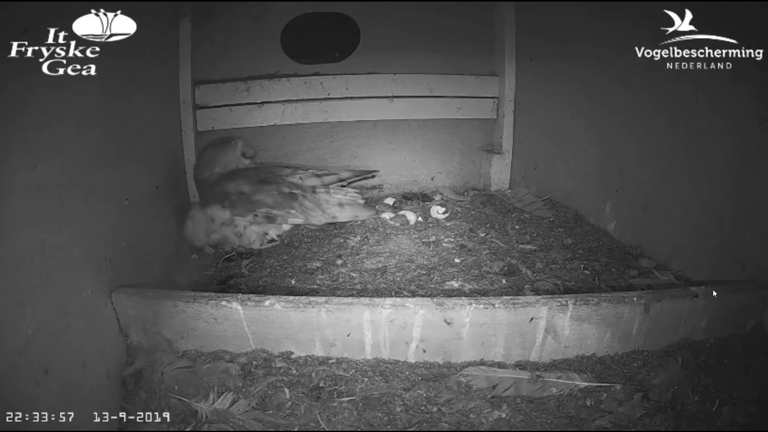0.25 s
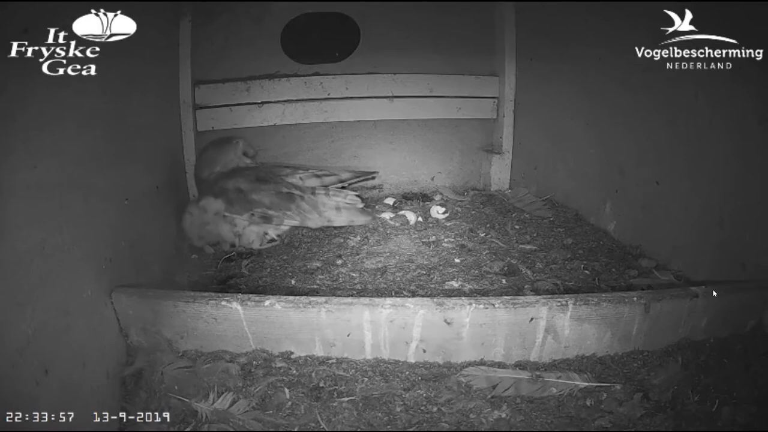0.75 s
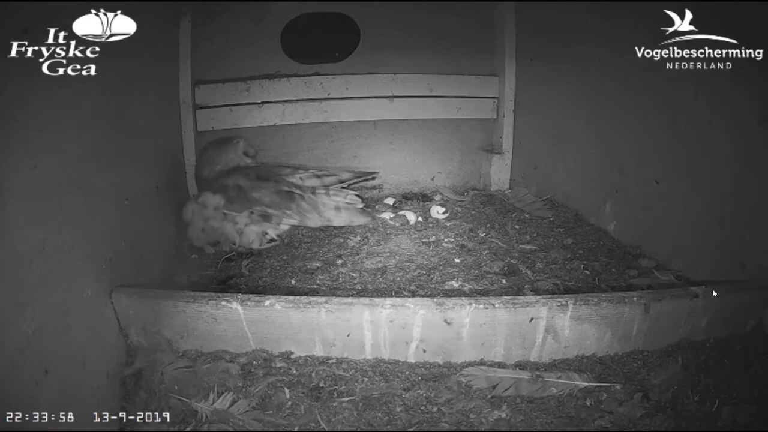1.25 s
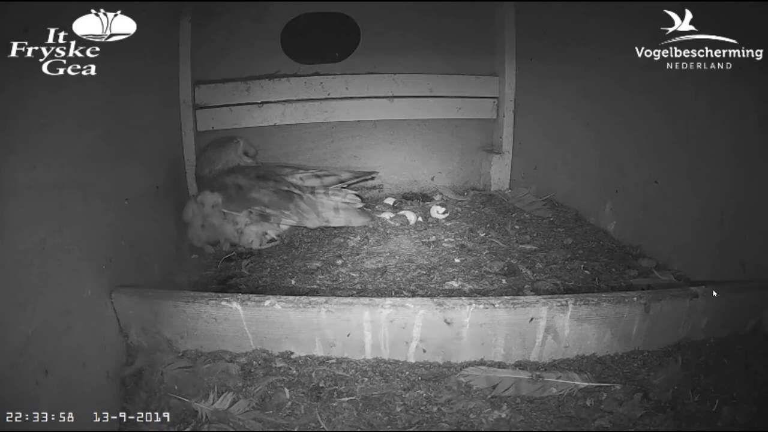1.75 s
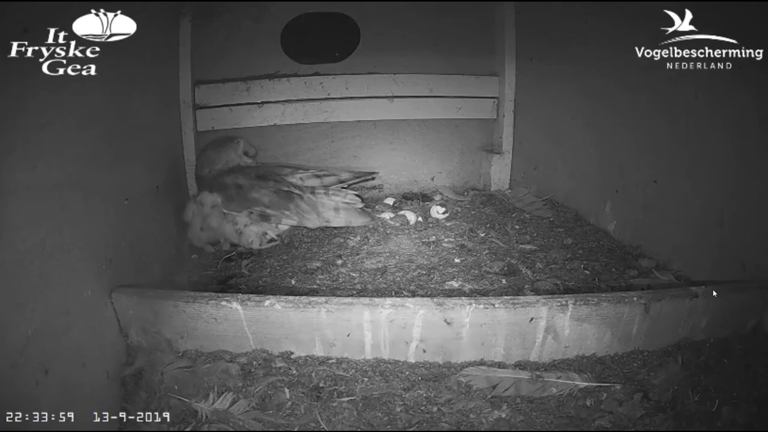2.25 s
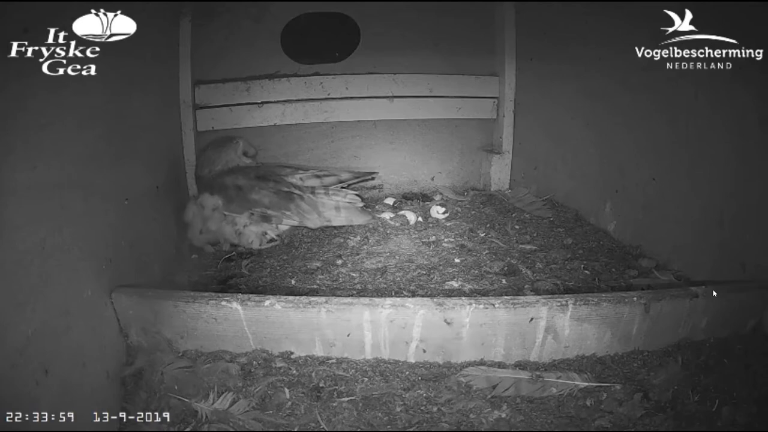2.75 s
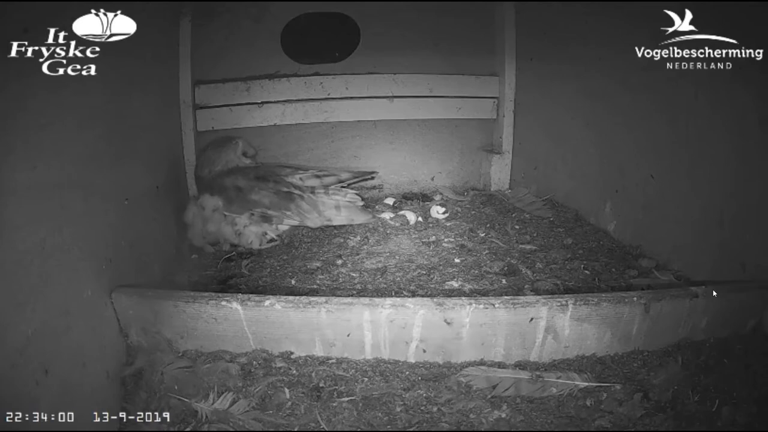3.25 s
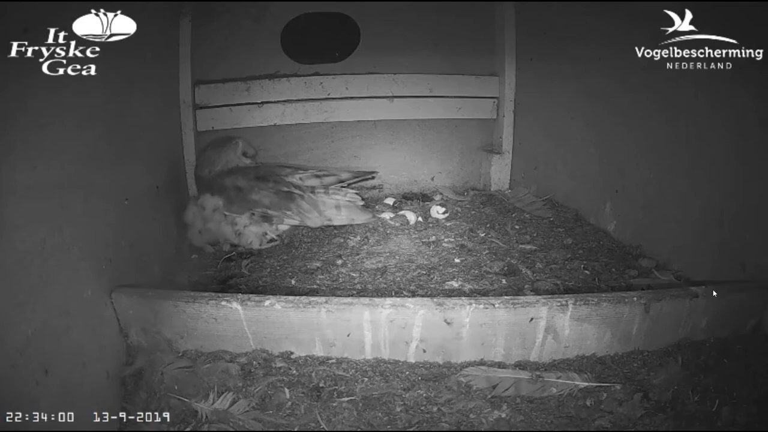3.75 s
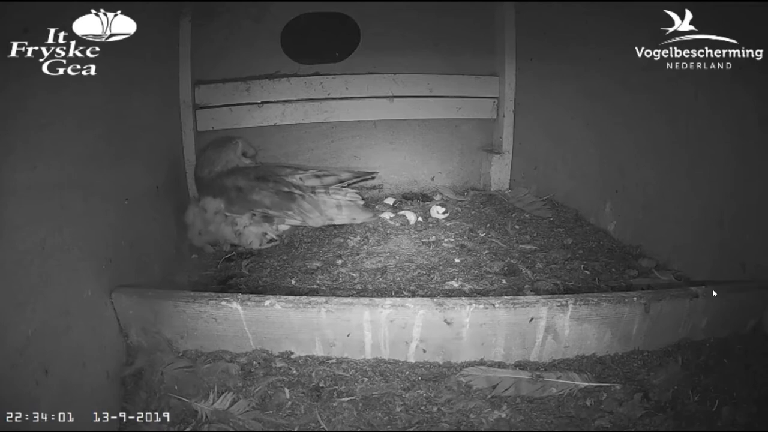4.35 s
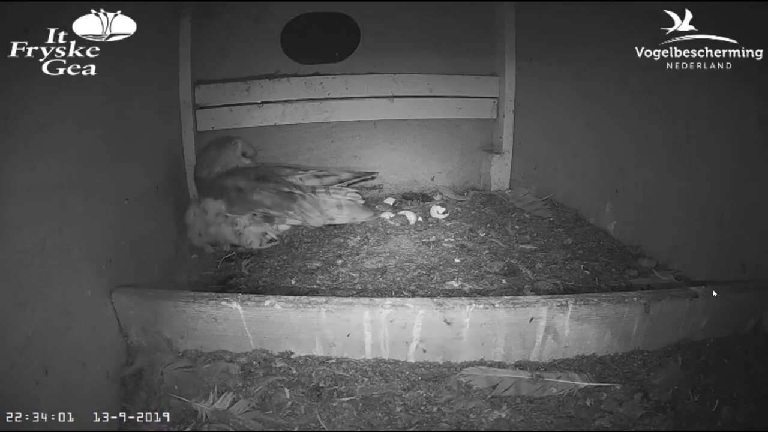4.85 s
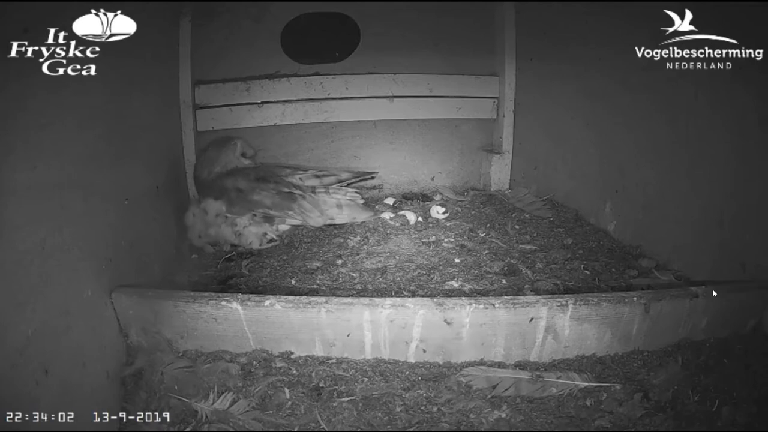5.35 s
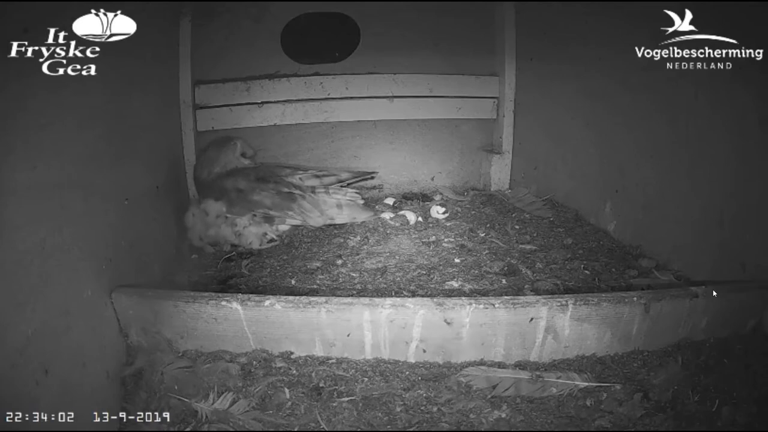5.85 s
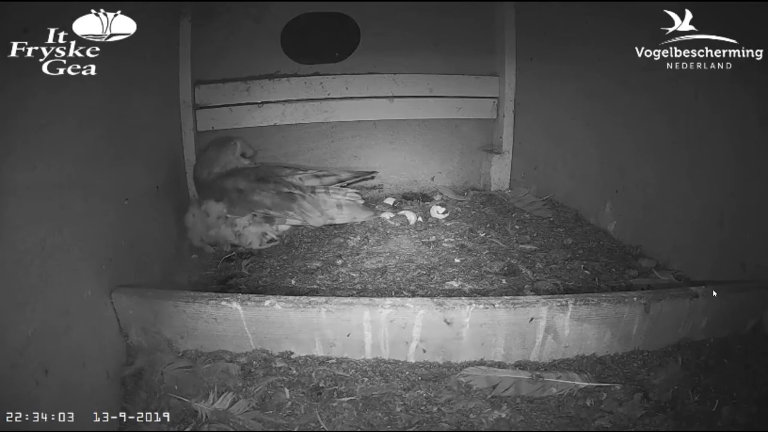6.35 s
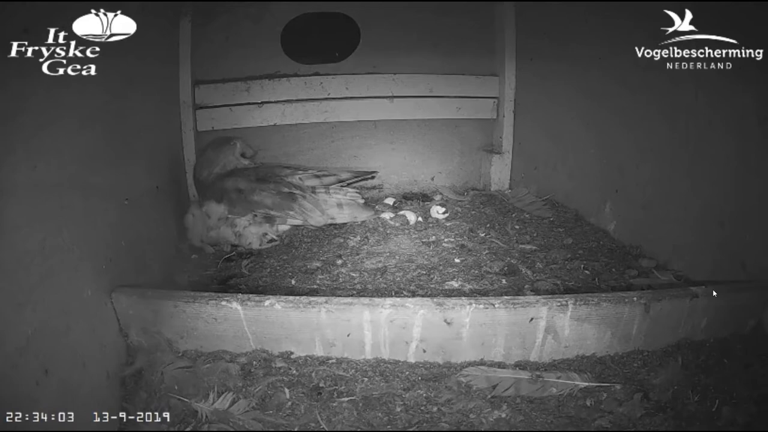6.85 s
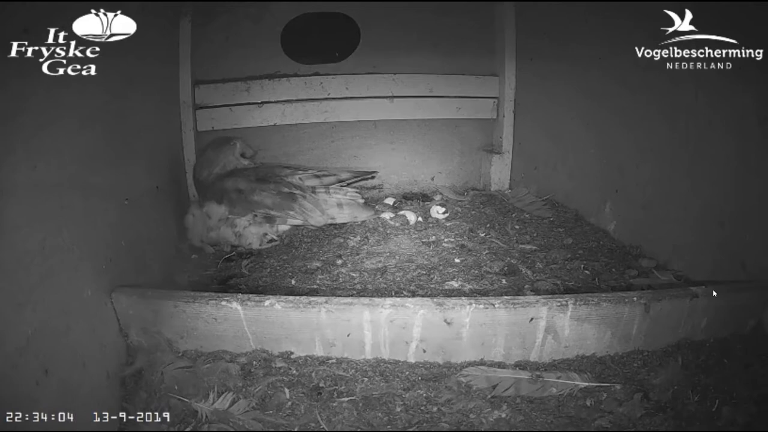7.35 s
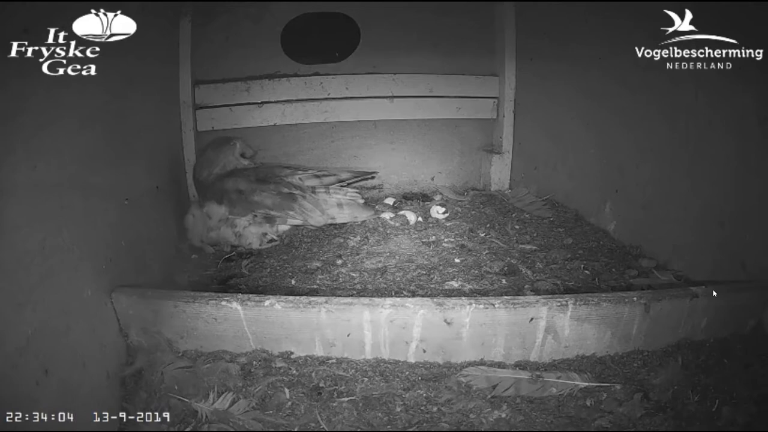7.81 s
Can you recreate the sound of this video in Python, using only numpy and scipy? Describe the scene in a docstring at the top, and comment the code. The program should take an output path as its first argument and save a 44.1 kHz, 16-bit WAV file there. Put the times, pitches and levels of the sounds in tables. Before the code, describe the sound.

Inside a wooden nest box at night, faint chick rasps and distant peeps open over low rumble and crackly hiss. A loud harsh owl hiss rasps for over half a second, then a soft high warbling twitter. A second, shorter hiss follows, then two more thin trills. A cheap, bright, band-limited camera microphone adds grit; the barn answers the hisses faintly.

```python
"""A young barn owl gives two loud rasping hisses: noise through resonances that open with its beak. Around them
a chick twitters softly (a warbling whistle) and rasps in short puffs of noise, and another peeps far off. The
wooden nest box colours and answers the owls; the barn answers the hisses, over a low rumble and the
microphone's soft hiss. A cheap camera rounds the sound in coarse logarithmic steps, so the quiet crackles
wherever the rumble crosses zero; its stream adds a little noise around every sound; the treble is then lifted
and the peaks limited."""
import sys
import numpy as np
from scipy import signal
from scipy.fft import rfft, irfft, next_fast_len
from scipy.io import wavfile
from scipy.ndimage import uniform_filter1d, minimum_filter1d, map_coordinates

SR = 44100
rng = np.random.default_rng(int(sys.argv[2]) if len(sys.argv) > 2 else 0)


def generate_wav(signal):
    """Clip the signal to [-1, 1] and save it as 16-bit WAV at the path in sys.argv[1]."""
    frames = np.transpose(np.atleast_2d(signal))
    scaled = np.clip(frames, -1, 1) * 32767
    pcm = np.round(scaled).astype(np.int16)
    wavfile.write(sys.argv[1], SR, pcm)


def ratio_of_db(decibels):
    """Turn decibels (scalar or array-like) into linear amplitude factors; 0 dB maps to 1."""
    return 10 ** (np.asarray(decibels, float) / 20)


N = 356328  # samples


def along(points, hz):
    """A curve through (Hz, value) points, straight on a log frequency axis."""
    point_hz, values = np.transpose(points)
    return np.interp(np.log(hz + 1), np.log(point_hz + 1), values)


def unit(x):
    """Scaled to rms 1."""
    return x / np.sqrt(np.mean(x ** 2) + 1e-20)


def coloured(x, db_at):
    """x through a zero-phase gain in dB, a function of Hz."""
    size = next_fast_len(len(x) + 8192)
    gain = ratio_of_db(db_at(np.fft.rfftfreq(size, 1 / SR)))
    return irfft(rfft(x, size) * gain, size)[:len(x)]


def rung(x, db_at):
    """x through a gain in dB that rings only after the sound (minimum phase)."""
    size = 2 * next_fast_len(len(x) // 2 + 4096)
    cepstrum = irfft(np.log(ratio_of_db(db_at(np.fft.rfftfreq(size, 1 / SR)))), size)
    # folding the cepstrum onto positive time makes the phase minimal
    cepstrum = cepstrum * np.r_[1, 2 * np.ones(size // 2 - 1), 1, np.zeros(size // 2 - 1)]
    return irfft(rfft(x, size) * np.exp(rfft(cepstrum)), size)[:len(x)]


def wobble(rate, count):
    """A smooth random curve, rate knots a second."""
    knots = rng.standard_normal(count // 25 + 4)
    return map_coordinates(knots, [np.arange(count) * min(rate / SR, .04)])


def add(track, start_s, sound):
    """Mix a sound in at start_s, with soft ends."""
    sound = sound * signal.windows.tukey(len(sound), min(1, 300 / len(sound)))
    track[round(start_s * SR):][:len(sound)] += sound


def glide(length_s, start_hz, end_hz):
    """Swell and phase of a short sliding note."""
    u = np.linspace(0, 1, round(length_s * SR))
    hz = start_hz + (end_hz - start_hz) * u
    return np.sin(np.pi * u), 2 * np.pi * np.cumsum(hz) / SR


# breakpoints of each hiss: time_s, throat_db, gape (about 0 shut, 1 wide), palate_hz, beak_hz, tip_db (re throat)
HISS_POINTS = [
    [(1.552, -78, .6, 2800, 5100, 28), (1.57, -29.5, 0, 2800, 5000, -16), (1.6, -19, .3, 2900, 5125, -15),
     (1.64, -16.5, 0.04, 2900, 4900, -21), (1.69, -22, .85, 3020, 5200, 3),
     (1.88, -25.5, 0.95, 2920, 5550, 11.5), (1.99, -25, 1.0, 2830, 5000, 9),
     (2.125, -26, 1.02, 2700, 4900, 6.5), (2.18, -29, 0.4, 2310, 4966, -8.5),
     (2.22, -62.5, .5, 1970, 4790, -5.5)],
    [(3.921, -73, .2, 2350, 4950, -20.5), (3.93, -27.5, 0.12, 2350, 4950, -31),
     (4.005, -19.5, .05, 2280, 4900, -28.5), (4.075, -23, 0.9, 2800, 4950, -4.5),
     (4.16, -25.5, 1.0, 2760, 4900, 7), (4.32, -27.5, 1.0, 2604, 4910, 9),
     (4.36, -33.5, 0.6, 2140, 4900, -9), (4.39, -58, .2, 1900, 4930, -10)],
]
# resonances throat, palate, beak, beak tip, jet: width_hz (full, 7.5 dB down)
RESONANCE_WIDTHS = (1300, 900, 1200, 1200, 6960)
# beak tip resonance, one for each hiss: centre_hz
TIP_CENTRES = (6720, 6510)
# palate, beak, jet: shut_db, gaping_db (both re throat)
GAPE_LEVELS = [(-9.5, 5), (-22, 8), (-41, -3.5)]
# colour of the box around the owl: frequency_hz, gain_db
BOX_COLOUR = [(300, -33), (600, -19.5), (820, -10), (1000, -0.5), (2100, -2.5), (3400, -1), (5500, -2),
              (7200, 3), (7800, 13)]
# standing waves in the box, for each place of the owl's head: centre_hz, width_hz (centre to 1/e of the dB), gain_db
STANDING_WAVES = [
    [(1385, 60, -7), (1620, 130, 6), (2420, 70, 3), (2600, 70, -6), (2760, 60, 4), (3060, 80, 7),
     (3350, 100, -6), (4200, 550, 4), (5650, 110, 4), (6300, 110, -5), (6700, 110, 5), (7130, 90, 6)],
    [(1200, 100, 5), (1385, 60, -6), (2420, 90, 5), (2880, 60, -5), (3100, 100, 6), (3900, 250, -4),
     (5030, 130, 4), (5420, 170, -9), (5950, 100, 6), (6700, 130, -5), (7150, 100, 5)],
]


def hisses():
    """Turbulent air through four resonances over a broad jet, the upper ones opening with the beak, in the box."""
    out = np.zeros(N)
    for rows, tip_hz, waves in zip(HISS_POINTS, TIP_CENTRES, STANDING_WAVES):
        point_s, throat_db, *columns = np.transpose(rows)
        count = round((point_s[-1] - point_s[0]) * SR)
        turbulence = rng.standard_normal(count) * ratio_of_db(.7 * wobble(300, count))  # the jet flutters
        hz, frame_s, spectrum = signal.stft(unit(turbulence), SR, nperseg=256)
        gape, palate_hz, beak_hz, tip_db = [np.interp(frame_s + point_s[0], point_s, c) for c in columns]
        palate_db, beak_db, jet_db = [shut + (wide - shut) * gape for shut, wide in GAPE_LEVELS]
        centres_hz = [1600, palate_hz, beak_hz, tip_hz, 5200]  # throat and jet stay put
        levels_db = [0, palate_db, beak_db, tip_db, jet_db]
        power = 0
        for centre, width, db in zip(centres_hz, RESONANCE_WIDTHS, levels_db):
            peak = (1 + (2 * (hz[:, None] - centre) / width) ** 2) ** -2.5  # steep skirts keep valleys dark
            power = power + peak / peak.mean(0) * ratio_of_db(2 * db)
        hiss = signal.istft(spectrum * np.sqrt(power), SR, nperseg=256)[1][:count]
        level_db = np.interp(point_s[0] + np.arange(count) / SR, point_s, throat_db)
        bare = np.zeros(N)
        add(bare, point_s[0], hiss * ratio_of_db(level_db))
        # many weaker standing waves, scattered by chance
        fine_spacing_hz, fine_depth_db = 45, 2.5
        fine_db = fine_depth_db * rng.standard_normal(round(SR / 2 / fine_spacing_hz))

        def box_db(f):
            """Gain of the box, with its strong and its finer standing waves."""
            strong = sum(db * np.exp(-((f - centre) / width) ** 2) for centre, width, db in waves)
            return along(BOX_COLOUR, f) + map_coordinates(fine_db, [f / fine_spacing_hz]) + strong

        out += rung(bare, box_db)
    return out


# breakpoints of each twitter, starting on a crest: time_s, crest_hz, dip_depth_hz, crest_level_db, warbles_per_s
TWITTER_POINTS = [
    [(3.094, 5520, 703, -48.5, 11.8), (3.14, 4750, 750.4, -50.5, 11.6), (3.27, 4800, 697, -50.5, 11.4),
     (3.64, 4720, 470, -51, 13), (3.675, 4600, 470, -65, 12.05)],
    [(5.058, 5000, 685, -50, 11.4), (5.3, 5000, 650, -46, 12.5), (5.41, 4860, 501.7, -46, 11.7),
     (5.635, 4720, 430, -53.5, 12.1)],
    [(6.585, 4950, 700, -54, 12.9), (6.67, 4830, 551.5, -56.5, 12.05), (6.748, 5010, 549.7, -50, 12.05),
     (6.76, 4453, 50, -52.5, 12.05), (6.79, 4890, 419, -48, 12.05), (6.83, 5060, 560, -47.5, 12),
     (7.08, 5000, 501.8, -48.5, 12.05), (7.23, 4830, 230.2, -48, 15.5), (7.255, 4830, 229, -61.5, 14.7)],
    [(.28, 4200, 400, -72, 13.3), (.43, 4300, 450, -69, 13.3)],
    [(.68, 4000, 400, -69, 13.3), (.875, 3800, 480, -69, 13.3)],
]
# the whistle flips up once: start_s, length_s, start_hz, end_hz, peak_db
UPWARD_FLIP = (6.742, .03, 5501, 6750, -48.5)


def twitters():
    """A thin whistle that warbles in round crests and sharp dips."""
    out = np.zeros(N)
    for rows in TWITTER_POINTS:
        point_s, *columns = np.transpose(rows)
        t = np.arange(point_s[0], point_s[-1], 1 / SR)
        crest_hz, depth_hz, crest_db, rate = [np.interp(t, point_s, c) for c in columns]
        dip = 1 - np.abs(np.cos(np.pi * np.cumsum(rate) / SR)) ** 1.3  # 0 on a crest, 1 in a dip
        hz = crest_hz - depth_hz * dip + 15 * wobble(200, len(t))  # slightly blurred pitch
        beads = .52 * wobble(120, len(t))
        breath = .19 * wobble(1300, len(t))  # a haze
        level = ratio_of_db(crest_db - 2 * dip) * (1 + beads + breath)  # dips are fainter than crests
        add(out, point_s[0], np.sqrt(2) * level * np.sin(2 * np.pi * np.cumsum(hz) / SR))
    start_s, length_s, start_hz, end_hz, peak_db = UPWARD_FLIP
    swell, phase = glide(length_s, start_hz, end_hz)
    add(out, start_s, ratio_of_db(peak_db) * swell * np.sin(phase))
    return out


# short rasps of a chick's breaking voice: start_s, length_s, centre_hz, width_hz (full, 6 dB down), level_db
VOICE_BREAKS = [(0.427, 0.043, 4900, 500, -62.5), (0.432, 0.072, 4270, 120, -63.5),
                (0.497, 0.082, 4564, 250, -61), (0.508, 0.025, 4980, 200, -64.5),
                (0.574, 0.051, 4820, 350, -62), (0.613, 0.017, 5700, 200, -59.5),
                (0.686, .03, 4687, 300, -64), (3.083, 0.039, 5220, 500, -61.5),
                (5.302, 0.016, 5417, 500, -61), (5.407, 0.012, 5560, 1300, -56.5),
                (6.674, 0.036, 5446, 1300, -55), (6.913, 0.017, 5570, 1610, -52.5)]


def voice_breaks():
    """Short puffs of narrow noise."""
    out = np.zeros(N)
    for start_s, length_s, centre, width, db in VOICE_BREAKS:
        puff = rng.standard_normal(SR // 10)[:round(length_s * SR)]
        narrow = coloured(puff, lambda hz: -6 * (2 * (hz - centre) / width) ** 2)
        add(out, start_s, ratio_of_db(db) * unit(narrow))
    return out


# far peeps: start_s, fall_hz (of the fundamental; negative rises), octave_peak_db
FAR_PEEPS = [(.619, -60, -55), (0.699, 103, -56.5), (0.779, 171.5, -58.5), (0.856, 99.5, -57),
             (.928, 312.5, -53)]


def peeps():
    """Small sliding notes, mostly falling, strongest in their octave."""
    length_s, start_hz, fundamental_db = .038, 3570, -11.5  # dB re the octave
    out = np.zeros(N)
    for start_s, fall_hz, db in FAR_PEEPS:
        swell, phase = glide(length_s, start_hz, start_hz - fall_hz)
        note = ratio_of_db(fundamental_db) * np.sin(phase) + np.sin(2 * phase)
        add(out, start_s, ratio_of_db(db) * swell * note)
    return out


def echoes(x, t60s, seconds):
    """A noise tail in which each frequency dies at its own speed, convolved with the sound."""
    hz, t, spectrum = signal.stft(rng.standard_normal(round(seconds * SR)), SR, nperseg=128)
    decay = ratio_of_db(-60 * t / along(t60s, hz)[:, None])
    tail = signal.istft(spectrum * decay, SR, nperseg=128)[1]
    return signal.fftconvolve(x, tail / np.linalg.norm(tail))[:N]


def box_walls(hiss, chicks):
    """The close wooden walls of the nest box answer at once and die fast."""
    t60s = [(1000, .1), (1500, .22), (2300, .08), (5000, .06)]  # Hz, s
    return echoes(ratio_of_db(-16) * hiss + ratio_of_db(-8.5) * chicks, t60s, seconds=.25)


# what leaves the box for the barn: frequency_hz, gain_db
BOX_OPENING = [(600, -1.5), (1800, -1), (3200, -7.5), (7000, -11)]
# decay of the barn: frequency_hz, t60_s
BARN_DECAY = [(500, 1.2), (1000, 4.5), (2500, 2.3), (4000, 3.5), (7000, 0.39)]


def barn_answer(hiss):
    """The wide barn around the box answers the hisses faintly and long."""
    escaped = coloured(hiss, lambda hz: along(BOX_OPENING, hz))
    return ratio_of_db(-39.5) * echoes(escaped, BARN_DECAY, seconds=3.5)


# level of the rumble: time_s, level_db
RUMBLE_LEVEL = [(0, -63.5), (.54, -63.5), (.7, -59.5), (.92, -58.5), (1.17, -63), (2.14, -63.5),
                (2.68, -59), (2.99, -65.5), (4.66, -64), (4.819, -71), (5.02, -64), (6.97, -64),
                (8.08, -69.5)]
# spectrum of the rumble: frequency_hz, density_db (relative, per Hz)
RUMBLE_SPECTRUM = [(15, -23), (38, -2), (60, -14), (120, -22.5), (200, -24.5), (400, -28.5), (1000, -43.5),
                   (2000, -87)]


def rumble():
    """Distant low rumble: noise shaped towards the bass, slowly swelling and sinking."""
    time_s, level_db = np.transpose(RUMBLE_LEVEL)
    noise = unit(coloured(rng.standard_normal(N), lambda hz: along(RUMBLE_SPECTRUM, hz)))
    return noise * ratio_of_db(np.interp(np.arange(N) / SR, time_s, level_db))


# treble lift: frequency_hz, gain_db
TREBLE_LIFT = [(300, -3), (1000, 6), (2000, 10.5), (4000, 10.5), (8000, 10.5)]
# converter's roll-off: frequency_hz, gain_db
CONVERTER_EDGE = [(6200, 0.5), (7000, -6.5), (7500, -9), (7900, -30.5), (8000, -65)]


def bright_db(hz):
    """The treble lift together with the converter's roll-off."""
    return along(TREBLE_LIFT, hz) + along(CONVERTER_EDGE, hz)


# level of the microphone's hiss: time_s, level_db
MIC_HISS_LEVEL = [(0, -71.5), (1.5, -69.5), (2.302, -65), (2.998, -67.5), (4.499, -68), (6, -65), (8.08, -65.5)]


def mic_hiss():
    """Soft microphone hiss: noise with lifted treble and a steep upper edge."""
    time_s, level_db = np.transpose(MIC_HISS_LEVEL)
    noise = unit(coloured(rng.standard_normal(N), bright_db))
    return noise * ratio_of_db(np.interp(np.arange(N) / SR, time_s, level_db))


def scene():
    """The owls in their box, the box in the barn."""
    hiss = hisses()
    chicks = twitters() + voice_breaks() + peeps()
    answers = box_walls(hiss, chicks) + barn_answer(hiss)
    return (hiss + chicks + answers + rumble() + mic_hiss())[None]


def smear(x):
    """The stream spreads a little noise around every sound, in time and pitch."""
    spectrum = signal.stft(x, nperseg=256)[2]
    nearby = uniform_filter1d(uniform_filter1d(np.abs(spectrum) ** 2, size=5, axis=0), size=3, axis=1)
    noise = signal.stft(rng.standard_normal(len(x)), nperseg=256)[2]
    noise = unit(np.abs(noise)) * np.exp(1j * np.angle(noise))
    return signal.istft(noise * np.sqrt(np.abs(nearby)), nperseg=256)[1][:len(x)]


def log_steps(x):
    """Steps with no zero level, doubling in size each octave of loudness: near silence only the sign is left."""
    smallest = ratio_of_db(-58)
    v = x / smallest
    step = 2 ** np.floor(np.log2(np.maximum(np.abs(v), 16) / 16))
    return (np.floor(v / step) + .5) * step * smallest


def limiter(x):
    """Turns the level down smoothly around peaks, looking ahead."""
    ceiling = .95
    needed = minimum_filter1d(ceiling / np.maximum(np.abs(x), ceiling), size=401)
    return x * uniform_filter1d(uniform_filter1d(needed, size=199), size=199)


def low_pass(x):
    """Removes everything above the highest recorded frequency."""
    return signal.sosfilt(signal.butter(12, 7950, fs=SR, output="sos"), x)


def record(dry):
    """A dull microphone at 16 kHz, logarithmic steps and stream noise, then the treble lift and the limiter."""
    heard = coloured(dry[0], lambda hz: -along(TREBLE_LIFT, hz))
    stepped = log_steps(signal.resample_poly(heard, 160, 441))  # 44.1 to 16 kHz
    streamed = stepped + ratio_of_db(-14) * smear(stepped)
    back = signal.resample_poly(streamed, 441, 160)[:N]
    mix = limiter(coloured(back, bright_db))
    return low_pass(mix[None])


dry = scene()
out = record(dry)
generate_wav(out)
```